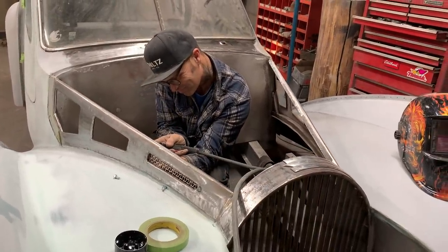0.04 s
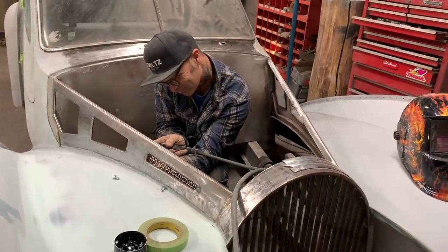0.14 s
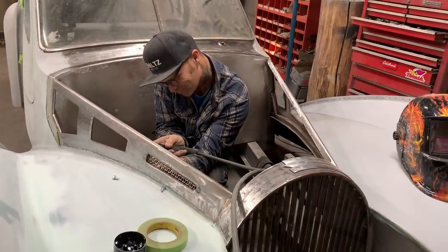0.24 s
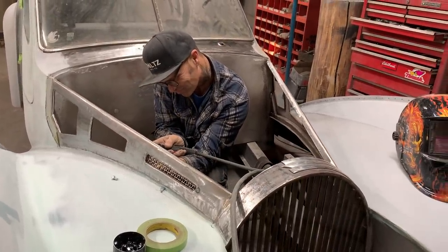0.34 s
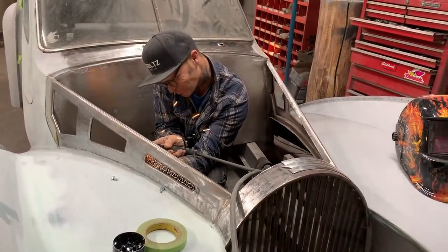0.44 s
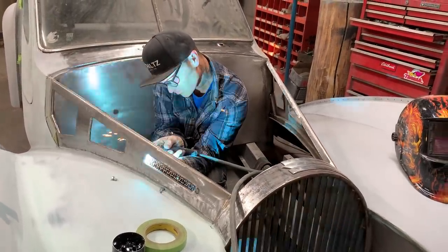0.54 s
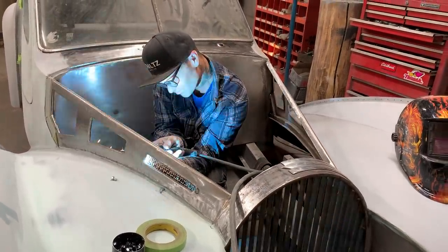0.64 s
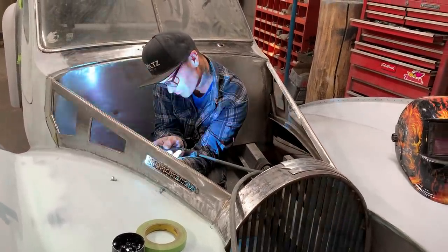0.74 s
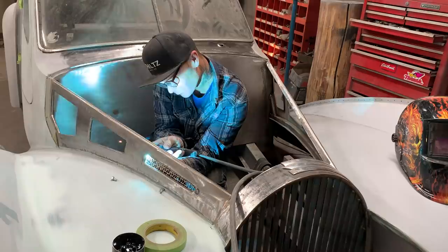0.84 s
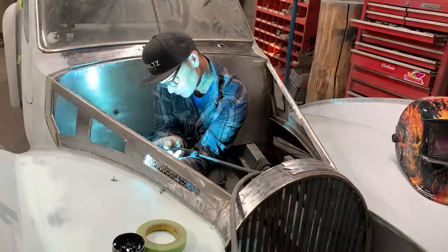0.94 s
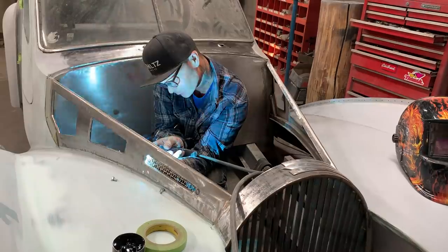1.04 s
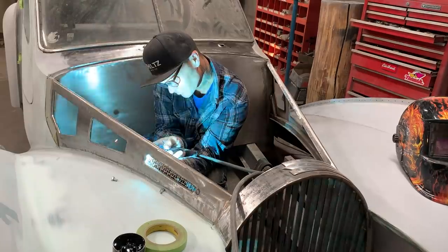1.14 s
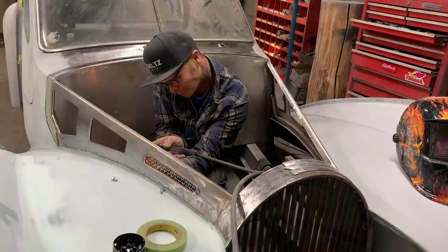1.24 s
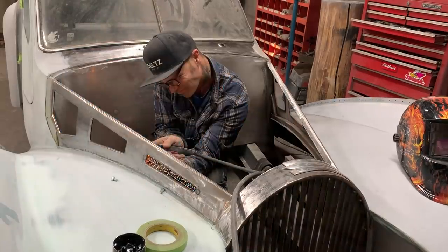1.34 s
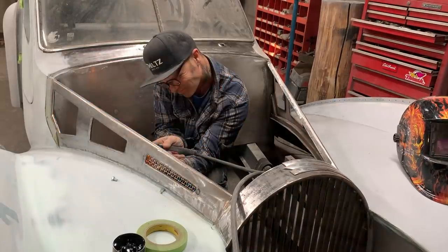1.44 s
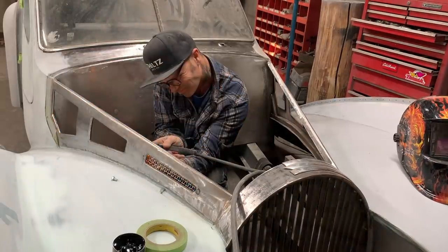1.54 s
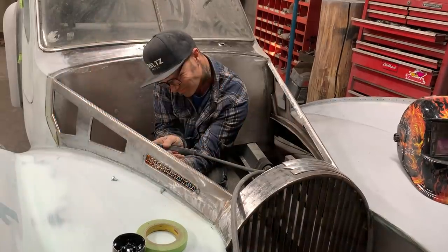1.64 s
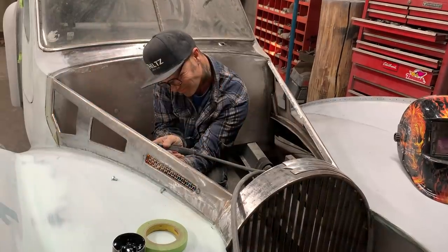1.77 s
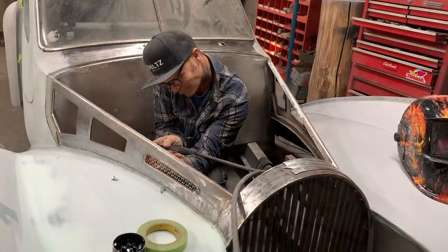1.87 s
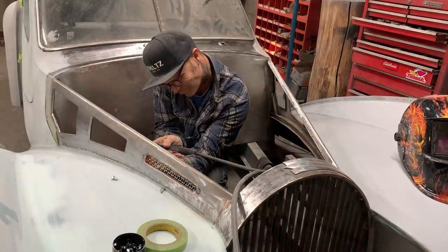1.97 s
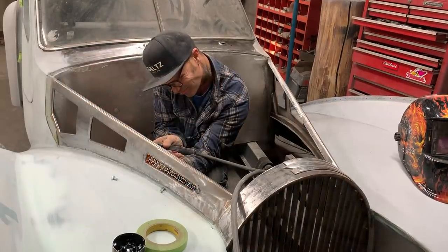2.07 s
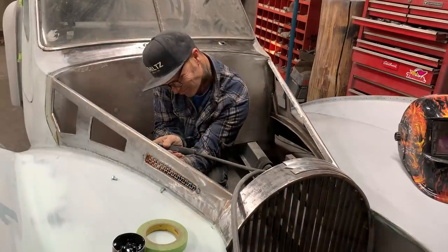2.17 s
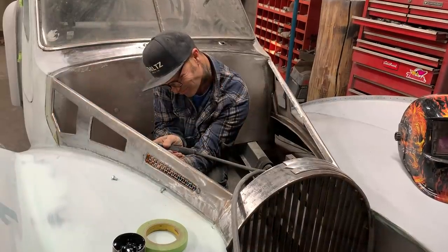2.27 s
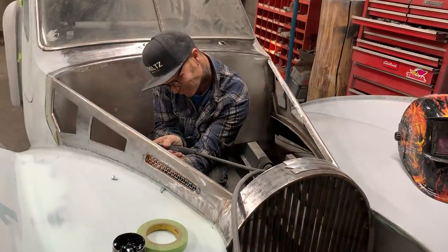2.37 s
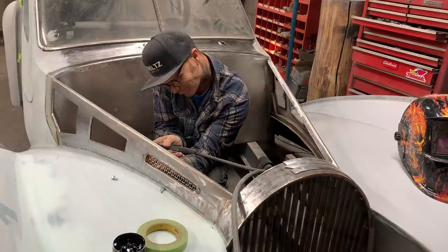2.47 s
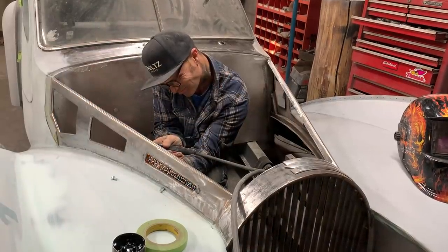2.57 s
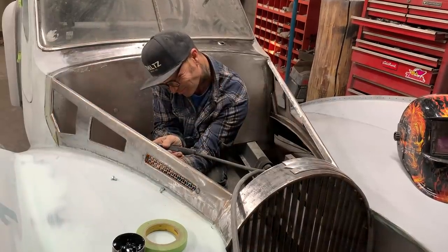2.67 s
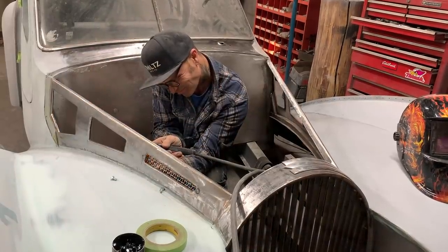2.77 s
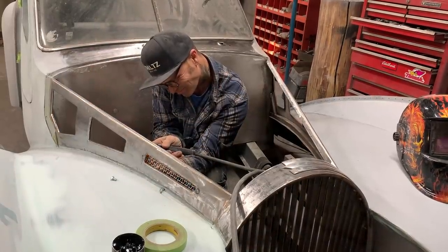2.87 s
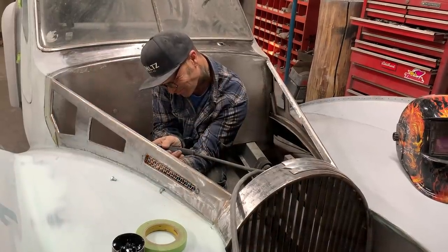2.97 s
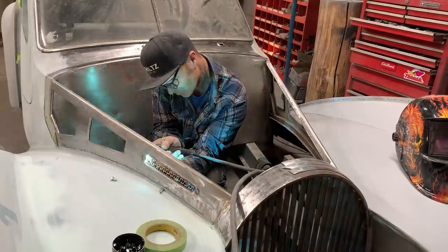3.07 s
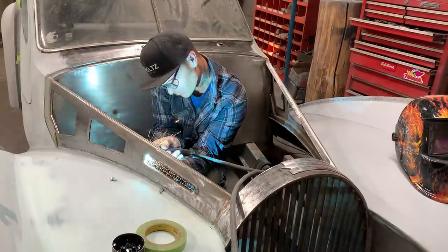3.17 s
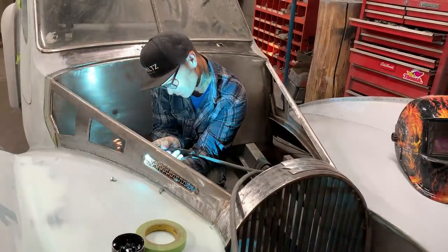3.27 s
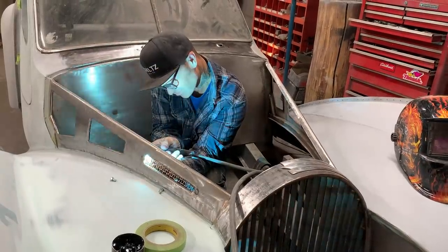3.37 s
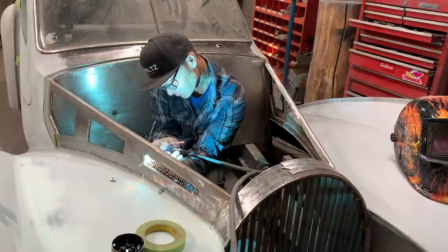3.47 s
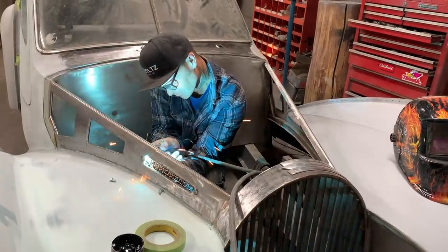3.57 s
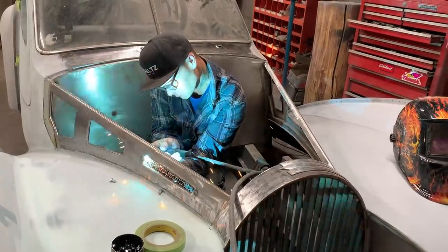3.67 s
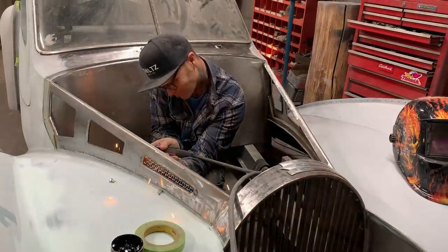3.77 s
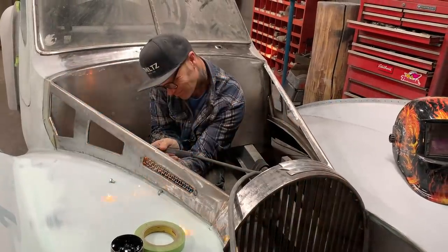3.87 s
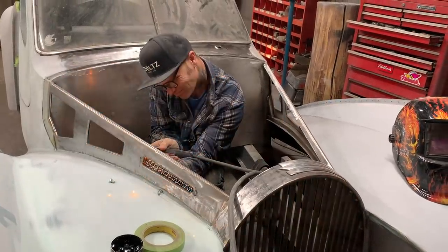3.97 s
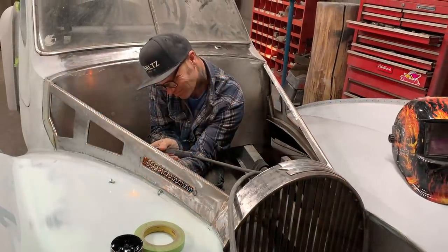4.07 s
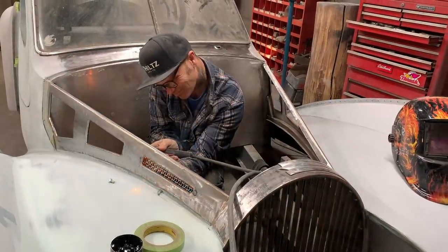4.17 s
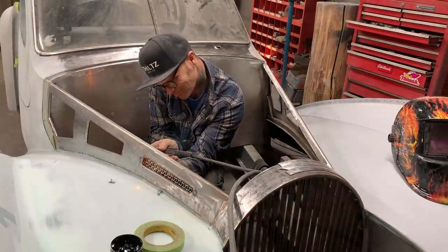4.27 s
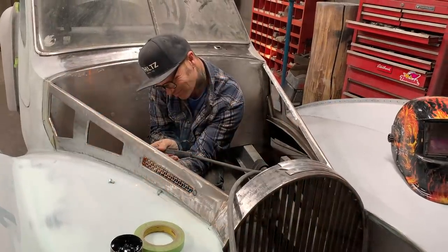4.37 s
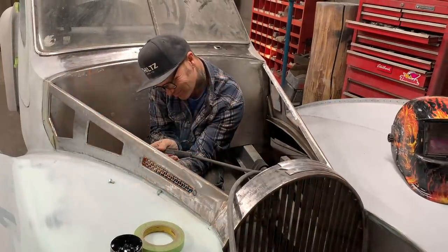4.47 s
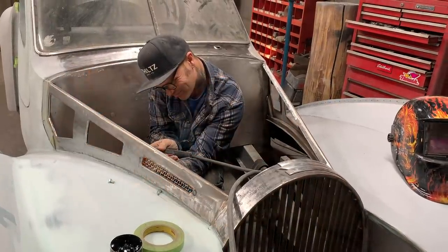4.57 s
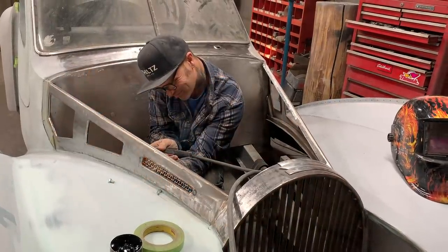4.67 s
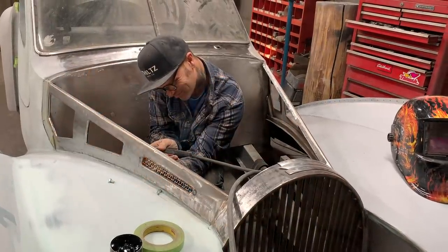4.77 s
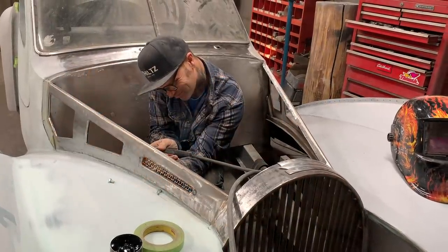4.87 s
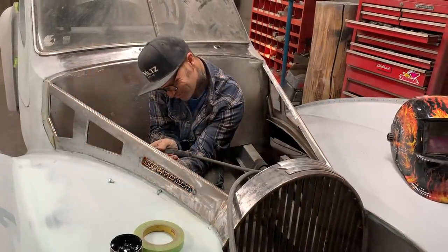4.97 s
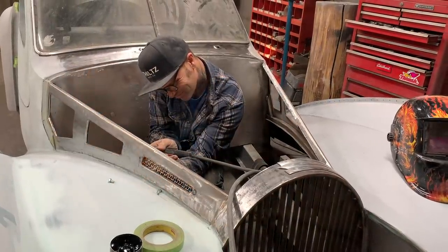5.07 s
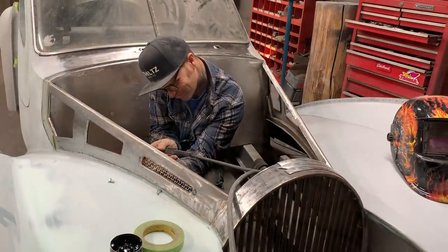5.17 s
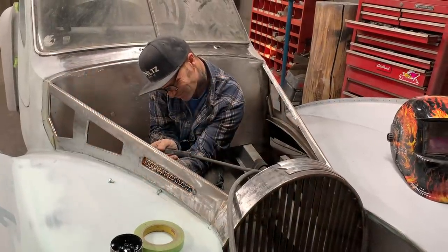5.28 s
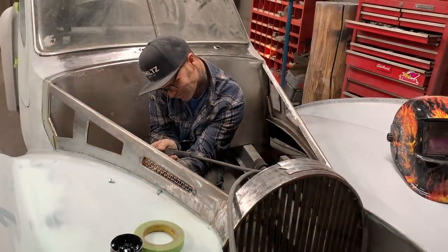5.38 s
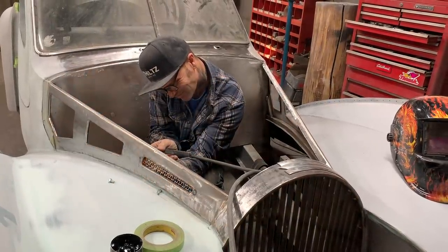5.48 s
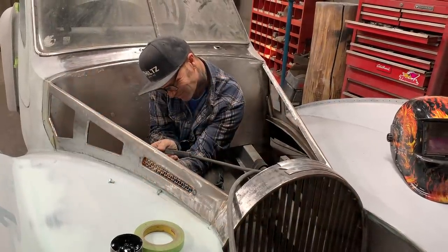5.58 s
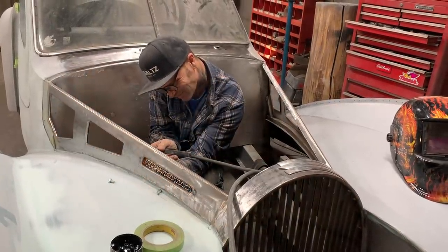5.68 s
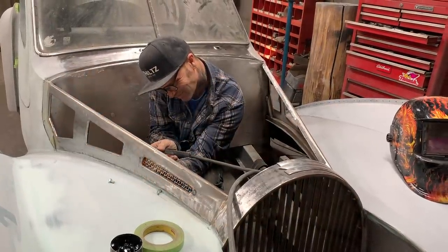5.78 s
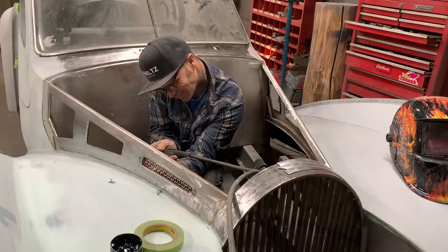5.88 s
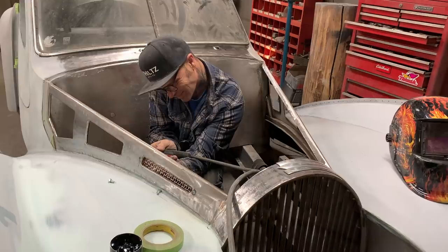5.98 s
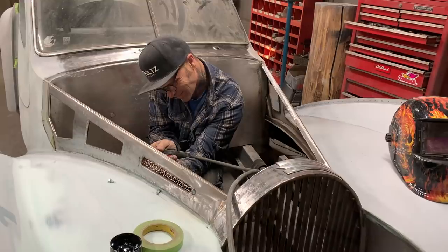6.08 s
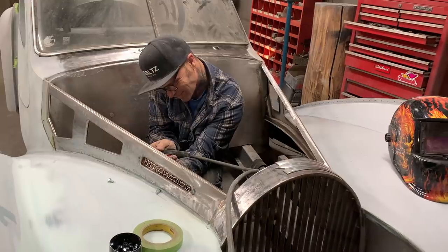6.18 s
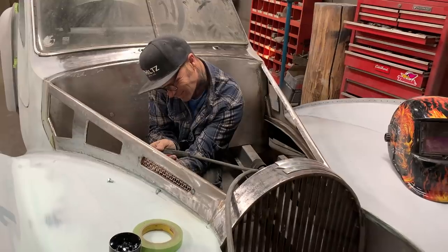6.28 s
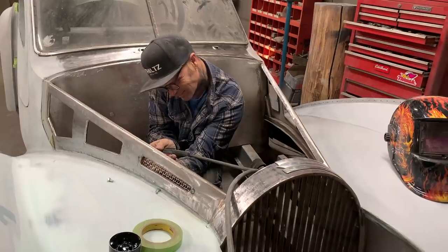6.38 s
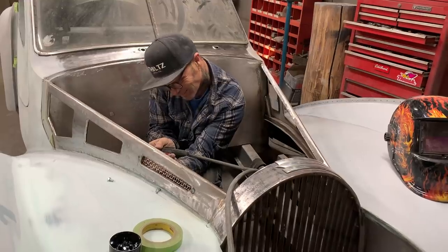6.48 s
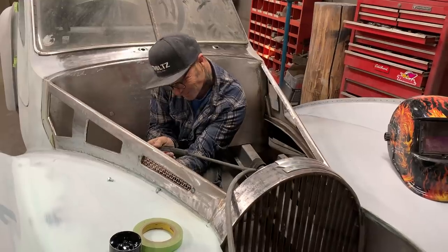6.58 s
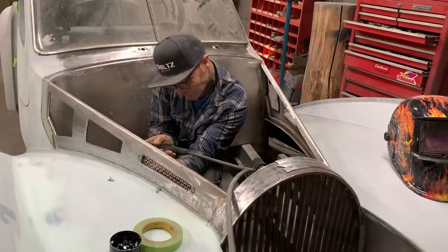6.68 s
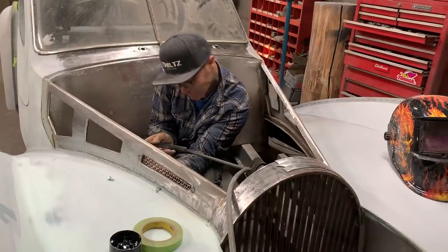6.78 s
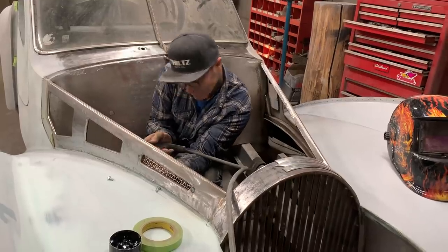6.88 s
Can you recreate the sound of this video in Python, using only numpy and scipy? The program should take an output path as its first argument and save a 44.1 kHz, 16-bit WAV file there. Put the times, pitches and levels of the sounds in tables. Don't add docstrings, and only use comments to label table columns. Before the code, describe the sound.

Welder fans whine steadily in a workshop as two crackling arc bursts snap through a bare steel car body, then cloth rubs and metal creaks.

```python
import sys
import numpy as np
from scipy import signal
from scipy.fft import rfft, irfft
from scipy.io import wavfile
from scipy.ndimage import uniform_filter1d, minimum_filter1d

SR = 44100
rng = np.random.default_rng(int(sys.argv[2]) if len(sys.argv) > 2 else 0)


def int16_out(signal):
    q = np.round(np.clip(np.atleast_2d(signal).T, -1, 1) * 32767)
    wavfile.write(sys.argv[1], SR, q.astype(np.int16))


def linear_from_db(decibels):
    return 10 ** (np.asarray(decibels, float) / 20)


N = 305172


def noise(size=N):
    return rng.standard_normal(size)


def level(x, db):
    return x * linear_from_db(db) / np.sqrt(np.mean(x ** 2))


def energy(x, db):
    return x * linear_from_db(db) / np.sqrt(np.sum(x ** 2))


def colour(x, spectrum):
    hz, db = np.transpose(spectrum)
    bins = np.maximum(np.fft.rfftfreq(len(x), 1 / SR), 1)
    gain = linear_from_db(np.interp(np.log(bins), np.log(hz), db))
    return irfft(rfft(x) * gain, len(x))


def band(x, lo_hz, hi_hz):
    return signal.sosfilt(signal.butter(2, [lo_hz, hi_hz], "band", fs=SR, output="sos"), x)


def walk(rate_hz):
    hold = int(SR / rate_hz)
    steps = np.repeat(noise(N // hold + 1), hold)
    return 1.1 * uniform_filter1d(uniform_filter1d(steps, hold), hold)[:N]


def through(x, response):
    return signal.fftconvolve(x, response)[:N]


def fan(shaft_hz, orders, wander=0.00059):
    turns = shaft_hz * np.cumsum(1 + wander * walk(1.5)) / SR
    out = np.zeros(N)
    for order, db in orders:
        swell = np.sqrt(2) * linear_from_db(db + 2.2 * walk(4.5))
        out += swell * np.sin(2 * np.pi * (order * turns + rng.random()))
    return out


SMALL_HZ, LARGE_HZ = 253.2, 118.85
# (multiple of shaft speed, level_db)
SMALL_FAN = [(1, -66), (3, -74), (4, -69.5), (7, -55), (7.5, -82.5), (8, -72), (9, -72.5), (10, -81),
             (11, -83.5), (12, -80.5), (13, -83.5), (14, -69), (15, -77), (16, -79), (17, -84)]
# (multiple of shaft speed, level_db)
LARGE_FAN = [(1, -80.5), (3, -69.5), (5, -61.5), (6, -75), (7, -78.5), (11, -76), (12, -86.5)]
# (pitch_hz, level_db)
CASE_TONES = [(466.3, -70), (860.6, -75)]
SUPPLY_HZ, SUPPLY_DB = 12021, -88
# (pitch_hz, level_db per Hz)
AIR = [(15, -7), (60, -15.5), (160, -16.5), (270, -19), (480, -12), (900, -14.5), (1600, -20.5),
       (3000, -23.5), (4000, -28), (5000, -32), (7000, -27.5), (8500, -33), (10500, -38), (16000, -42.5)]
AIR_DB = -67.5


def fans():
    out = fan(SMALL_HZ, SMALL_FAN) + fan(LARGE_HZ, LARGE_FAN)
    for hz, db in CASE_TONES:
        out += fan(hz, [(1, db)])
    out += linear_from_db(SUPPLY_DB) * np.sin(2 * np.pi * SUPPLY_HZ * np.arange(N) / SR)
    rush = np.zeros(N)
    for lo_hz in 18 * 2 ** np.arange(0, 10.):
        rush += band(noise(), lo_hz, 2 * lo_hz) * linear_from_db(0.72 * walk(7.2))
    rush = colour(rush, AIR)
    return out + rush * linear_from_db(AIR_DB) / np.std(band(rush, 2100, 3800))


# (peak_s, level_db, swell_s, fade_s); swell and fade span 20 dB
RUMBLES = [
    (.46, -54, .04, .25),
    (.98, -57.5, .04, 0.37),
    (3.05, -63, .1, 1.2),
    (4.21, -47, .12, .3),
    (4.33, -50, .12, .15),
    (4.43, -58, 0.052, .1),
    (6.66, -44, .05, .1),
    (6.74, -37, 0.12, 0.27),
    (6.82, -42.5, .15, .1),
    (6.92, -36, .07, 0.092),
]
# (time_s, effort_db)
LEAN = [
    (6.1, -74),
    (6.5, -59.5),
    (6.73, -52.5),
    (6.76, -66),
    (6.86, -62.5),
    (6.92, -53.5),
]
STILL_DB = -71.5
RUB_DB, LEAN_RUMBLE_DB = -1.5, -3
RUB_STEEPNESS = 1.4


def rocking():
    t = np.arange(N) / SR
    lean_s, effort_db = np.transpose(LEAN)
    lean = linear_from_db(np.interp(t, lean_s, effort_db, left=-120))
    load = linear_from_db(STILL_DB) + linear_from_db(LEAN_RUMBLE_DB) * lean
    for s, db, swell_s, fade_s in RUMBLES:
        distance = np.maximum((s - t) / swell_s, (t - s) / fade_s)
        load = np.maximum(load, linear_from_db(db - 20 * distance))
    rumble = level(band(band(noise(), 10, 60), 8, 90), 0) * load
    creak = level(band(noise(), 130, 500) * linear_from_db(1.5 * walk(30)), 1.5) * lean
    rub = level(band(noise(), 500, 2800) * linear_from_db(1.5 * walk(60)), -3.5)
    hardest = lean.max()
    rub *= (lean / hardest) ** RUB_STEEPNESS * hardest * linear_from_db(RUB_DB)
    return rumble + creak + rub


# (start_s, end_s, start_level_db, end_level_db)
SIZZLE = [(0.329, 0.356, -49, -40.5), (0.346, 0.369, -35, -39), (0.442, 0.445, -49, -45.5),
          (0.45, 0.474, -21, -38.5), (0.57, 0.587, -30, -54), (.586, 0.612, -31.5, -48.5),
          (0.612, 0.641, -43.5, -40), (0.654, 0.766, -43, -35.5), (0.827, 0.901, -33.5, -39.5),
          (0.957, 0.98, -51, -27.5), (0.982, 1.066, -35.5, -39), (3.066, 3.113, -43, -41.5),
          (3.107, 3.271, -41.5, -32), (3.269, 3.621, -39.5, -38)]


def sizzle():
    out, t = np.zeros(N), np.arange(N) / SR
    for start_s, end_s, start_db, end_db in SIZZLE:
        on = (t > start_s) & (t < end_s)
        count = on.sum()
        hail = noise(count) * linear_from_db(2.7 * rng.exponential(size=count))
        out[on] += hail * linear_from_db(np.interp(t[on], [start_s, end_s], [start_db, end_db]) - 12.5)
    return band(out, 300, 13000)


# (pitch_hz, level_db per Hz)
SHOP = [(70, -38.5), (130, -22), (220, -19.5), (350, -18.5), (520, -7.5), (800, -7), (1200, -5.5),
        (1650, -4), (2050, -11.5), (3000, -10.5), (5000, -8), (8000, -8.5), (11000, -15), (16000, -26)]
# (pitch_hz, fall_s)
SHOP_T60 = [(200, 1), (530, 0.83), (1400, 0.86), (3000, 0.59), (6000, 0.36), (10000, 0.25), (15000, 0.25)]


def shop(onset_s=0.004):
    t, out = np.arange(SR) / SR, np.zeros(SR)
    hz, t60_s = np.transpose(SHOP_T60)
    for centre_hz in 90 * 2 ** np.arange(0, 7.6, .5):
        fall_s = np.interp(np.log(centre_hz), np.log(hz), t60_s)
        tail = band(colour(noise(SR), SHOP), centre_hz / 1.19, centre_hz * 1.19)
        out += tail * linear_from_db(-60 * t / fall_s)
    return energy(out * (1 - np.exp(-t / onset_s)), 0)


# (start_s, level_db, pitch_hz, ring_s)
KNOCKS = [
    (.335, -25, 800, 0.035),
    (1.627, -39, 1210, 0.12),
    (6.415, -50, 1000, 0.019),
    (6.70, -55, 1100, .09),
    (6.895, -58, 1600, .06),
]
# (start_s, level_db, pitch_hz, ring_s)
TICKS = [
    (.4171, -44, 2800, 0.014),
    (1.6245, -41, 5960, 0.11),
    (5.42, -62, 9000, .02),
]
KNOCK_RATIO, KNOCK_SHOP_DB, TICK_RATIO, TICK_SHOP_DB = 2.34, -5.5, 1.45, -19


def ticks(room):
    out, t = np.zeros(N), np.arange(SR // 4) / SR
    kinds = (KNOCKS, KNOCK_RATIO, KNOCK_SHOP_DB), (TICKS, TICK_RATIO, TICK_SHOP_DB)
    for table, ratio, shop_db in kinds:
        bursts = np.zeros(N + len(t))
        for s, db, hz, ring_s in table:
            at = int(s * SR)
            burst = level(band(noise(len(t)), hz / ratio, hz * ratio), db)
            bursts[at:at + len(t)] += burst * linear_from_db(-60 * t / ring_s)
        out += bursts[:N] + linear_from_db(shop_db) * through(bursts, room)
    return out


# (time_s, peak_db, push_db on the panels)
STRIKES = [
    (0.4496, 4, -5),
    (0.4592, -4, -18),
    (3.0112, -8.5, -27),
]
# (time_s, peak_db)
SHORTS = [(0.4804, 0.5), (0.6452, -4.5), (0.6796, -1), (0.713, -4.5), (0.7483, -2.5), (0.823, -4),
          (0.8315, -12), (0.844, -5.5), (0.855, -8.5), (0.887, -4.5), (0.9765, 2.5), (0.9974, -4),
          (1.0104, -10), (1.0355, -5), (1.0591, -1.5),
          (3.0592, -3), (3.0724, -10), (3.1022, -5), (3.1196, -2), (3.1306, -4.5), (3.1395, -5),
               (3.1482, 1.5), (3.1573, -6.5), (3.1693, -4), (3.1858, -4), (3.2037, 3.5), (3.2154, -8),
               (3.2327, -2.5), (3.2449, 0), (3.2551, 1), (3.2853, -0.5), (3.3075, -0.5), (3.327, 2),
               (3.3457, -0.5), (3.3798, 2.5), (3.3989, -1.5), (3.4204, 4), (3.442, 1), (3.4742, 3),
               (3.5021, 0.5), (3.5324, 1), (3.555, 0), (3.5679, -2.5), (3.5915, -0.5), (3.6251, 1)]
# (time_s, push_db)
POOL = [
    [(.48, -17), (.65, -23.5), (.85, -24), (1.06, -16)],
    [(3.06, -21), (3.2, -16), (3.4, -21), (3.63, -21)],
]
PUSH_FOLLOWS_SNAP, PUSH_SCATTER_DB = .2, 1.5


def snaps():
    s, db = np.transpose(SHORTS)
    pool_s, pool_db = np.transpose(np.concatenate(POOL))
    push_db = np.interp(s, pool_s, pool_db) + PUSH_FOLLOWS_SNAP * db
    push_db += PUSH_SCATTER_DB * noise(len(s))
    return np.hstack([np.transpose(STRIKES), [s, db, push_db]])


# (delay_ms, share of the direct snap)
ECHOES = [(0, 1), (.3, -.25), (.48, .56), (.67, .95), (.87, .6), (1.12, .33), (1.29, .44), (1.38, -.33),
          (1.53, -.36), (2.18, -.5), (2.69, .31), (3.16, .33), (3.32, .27), (4.79, -.38), (5.83, -.25)]


def spark(width_ms=0.045, edge_ms=0.0097, edge_db=-6, blunt_ms=4.2):
    delay_ms, share = np.transpose(ECHOES)
    age_ms = np.arange(400)[:, None] / SR * 1000 - delay_ms - .15

    def n_wave(width):
        return age_ms / width * np.exp(.5 - (age_ms / width) ** 2 / 2)

    edge = linear_from_db(edge_db) * n_wave(edge_ms) * np.exp(-delay_ms / blunt_ms)
    return (n_wave(width_ms) + edge) @ share


def recess(hz=1500, t60_s=0.0071):
    t = np.arange(SR // 40) / SR
    return np.sin(2 * np.pi * hz * t) * linear_from_db(-60 * t / t60_s)


# (pitch_hz, level_db per Hz)
SCATTER = [(59, -60), (100, -21), (752, -13.5), (836, -8.5), (1030, -6), (1280, -10), (1550, 1.5),
           (2000, -15.5), (2580, -10.5), (3780, -7), (4670, -19), (8280, 1), (16000, -19)]


def body(low_t60_s=0.087, mid_t60_s=0.051, high_t60_s=0.018, rise_s=0.0013):
    t = np.arange(SR // 5) / SR
    out = np.zeros(len(t))
    for lo_hz, hi_hz, t60_s in (100, 2000, low_t60_s), (2000, 6500, mid_t60_s), (6500, 19000, high_t60_s):
        out += band(colour(noise(len(t)), SCATTER), lo_hz, hi_hz) * linear_from_db(-60 * t / t60_s)
    return out * (1 - np.exp(-t / rise_s))


# (pitch_hz, width_hz, level_db)
PANELS = [(762, 33, -1), (1072, 27, -3.5), (1313, 26, -3.5), (1585, 63, 2), (2378, 180, -5),
          (3000, 140, -28), (3450, 57, -44), (3860, 100, -6.5), (4460, 120, -1.5), (4900, 170, -16)]


def panels():
    t = np.arange(SR // 4) / SR
    out = np.zeros(len(t))
    for hz, width_hz, db in PANELS:
        fade = np.exp(-np.pi * width_hz * t)
        out += linear_from_db(db) * np.sqrt(width_hz) * np.sin(2 * np.pi * hz * t) * fade
    return out


SNAP_DELAY_S = 0.00086
THUD_DB, DULL_PER_DB = 2, .04


def arc(room):
    s, db, push_db = snaps()
    sharp, push = np.zeros(N), np.zeros(N)
    at = ((s + SNAP_DELAY_S) * SR).astype(int)
    blunt = np.clip(-DULL_PER_DB * db, -.2, .5)
    sharp[at] = linear_from_db(db - 3.5) * (1 - blunt)
    sharp[at + 1] = linear_from_db(db - 2.5) * blunt
    push[at] = linear_from_db(push_db + 10)
    thump = linear_from_db(THUD_DB) * band(sharp, 85, 330)
    sharp += sizzle()
    bounces = energy(body(), 9.26)
    ringing = energy(panels(), 7.2)
    ringing += np.pad(energy(band(bounces, 520, 2600), 3), (0, SR // 20))
    near = through(sharp, spark()) + through(sharp, linear_from_db(-19) * recess())
    near += through(sharp, bounces) + through(push, ringing)
    far = linear_from_db(5) * through(.5 * sharp + .5 * push, room)
    return band(near, 260, 20000) + thump + far


def scene():
    room = shop()
    return (fans() + rocking() + ticks(room) + arc(room))[None]


def band_limit(x):
    return signal.sosfilt(signal.butter(12, 16810, fs=SR, output="sos"), x)


def record(dry):
    top = signal.ellip(12, .2, 60, 15780, fs=SR, output="sos")
    cut = signal.sosfilt(top, dry)
    gain = np.minimum(1, .72 / (np.abs(cut) + 1e-9))
    gain = uniform_filter1d(minimum_filter1d(gain, size=31), size=31)
    return band_limit(signal.sosfilt(top, cut * gain))


dry = scene()
out = record(dry)
int16_out(out)
```